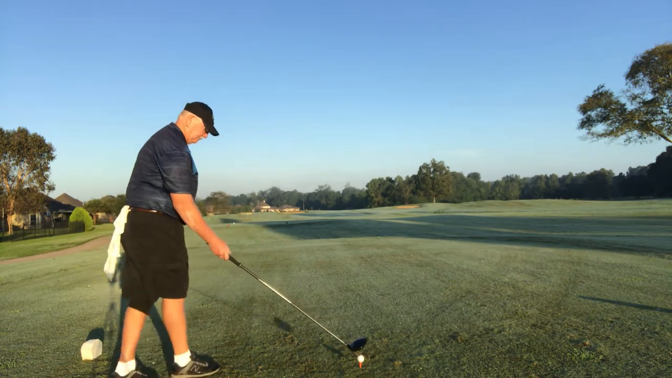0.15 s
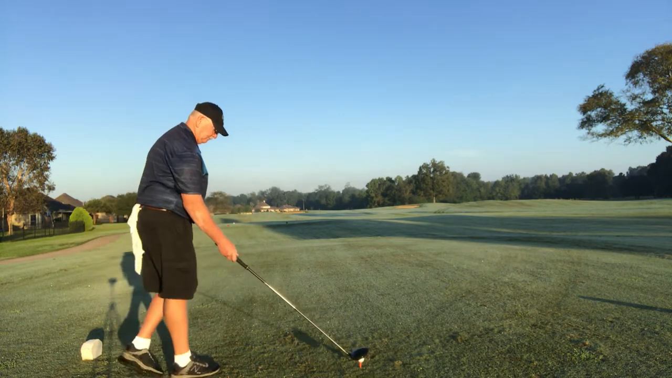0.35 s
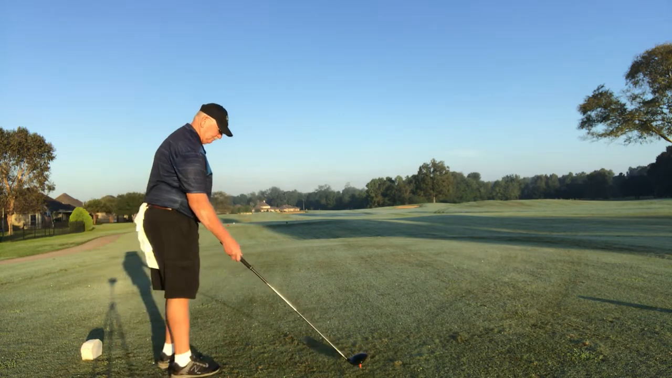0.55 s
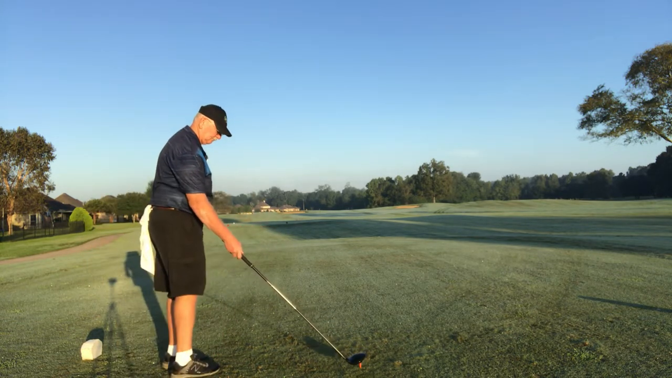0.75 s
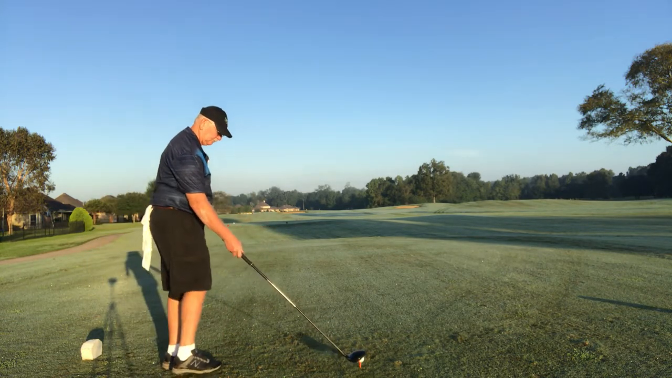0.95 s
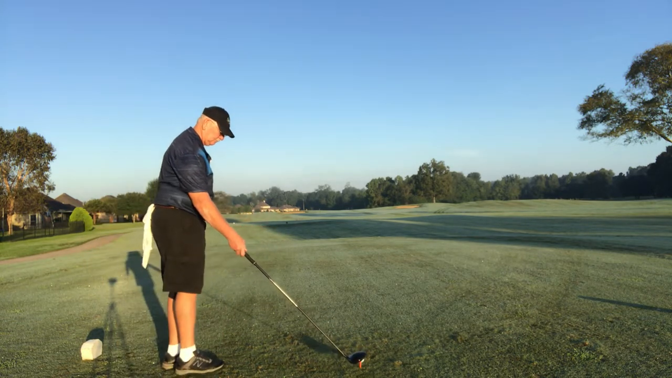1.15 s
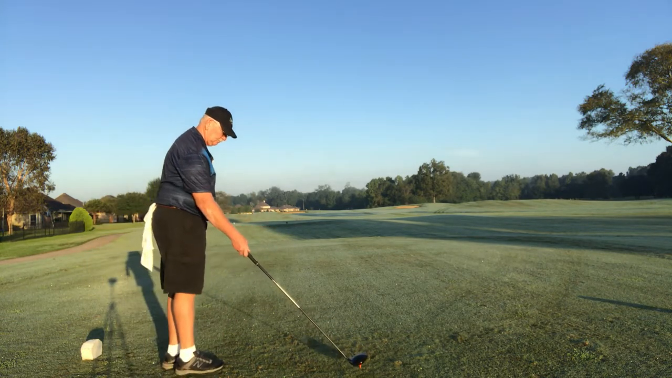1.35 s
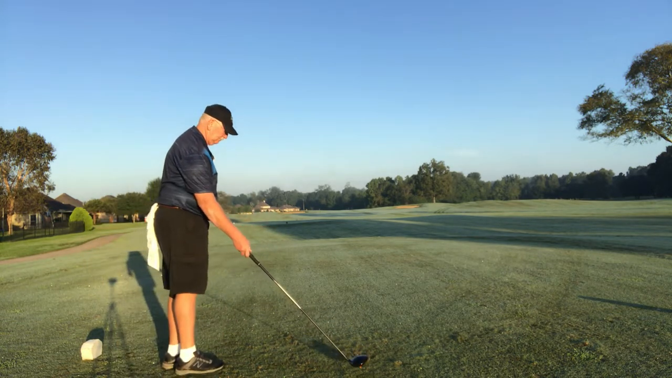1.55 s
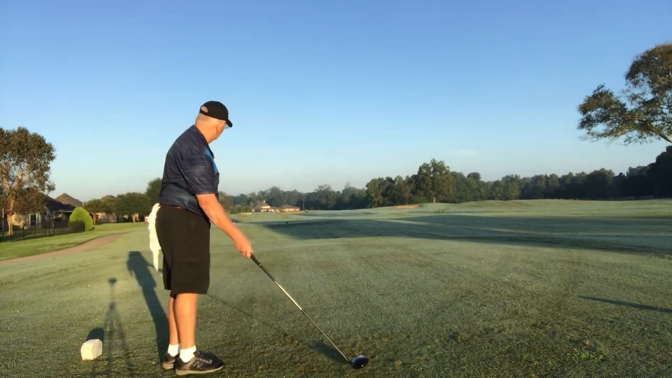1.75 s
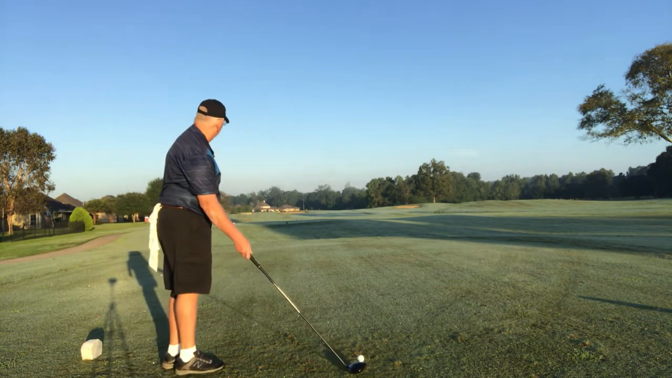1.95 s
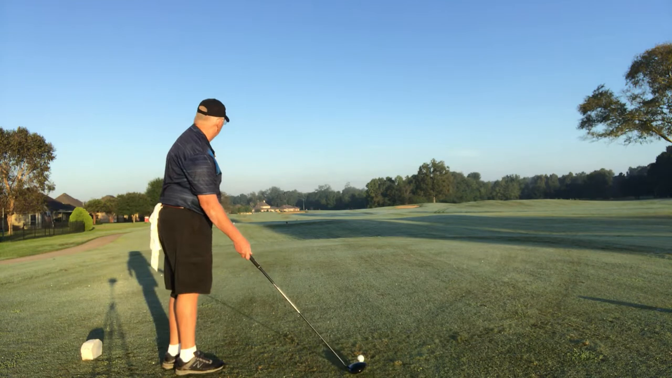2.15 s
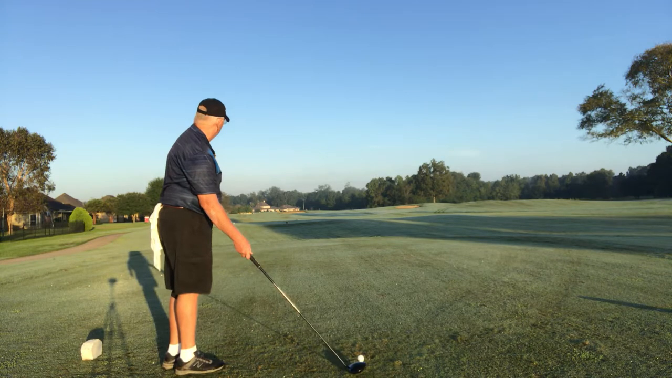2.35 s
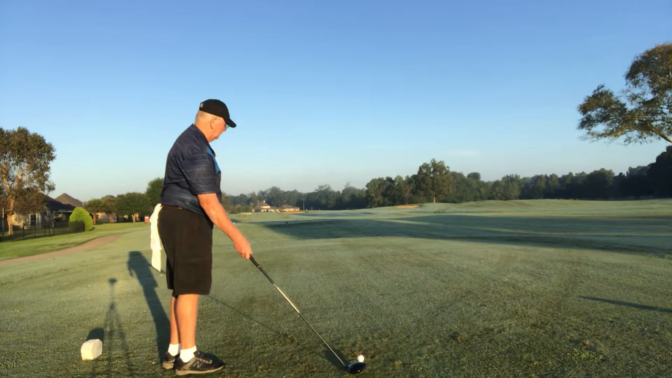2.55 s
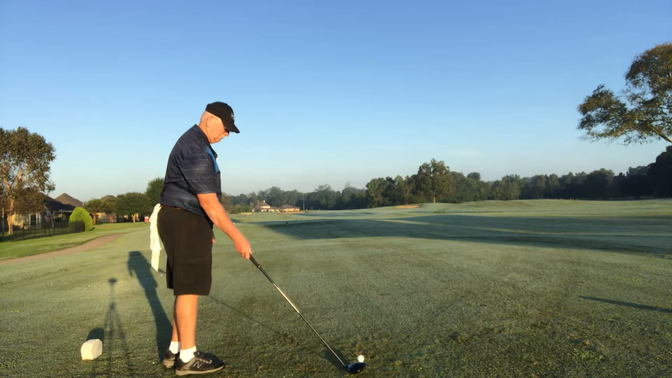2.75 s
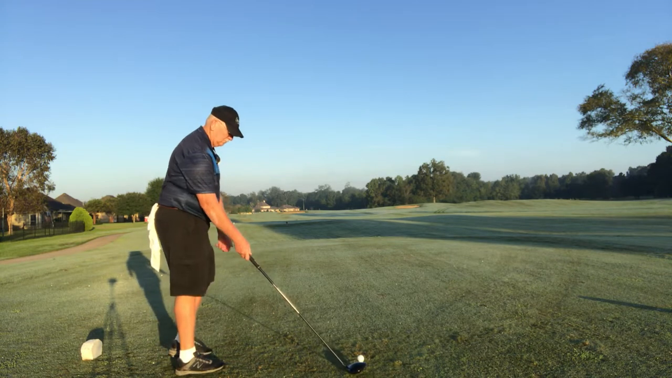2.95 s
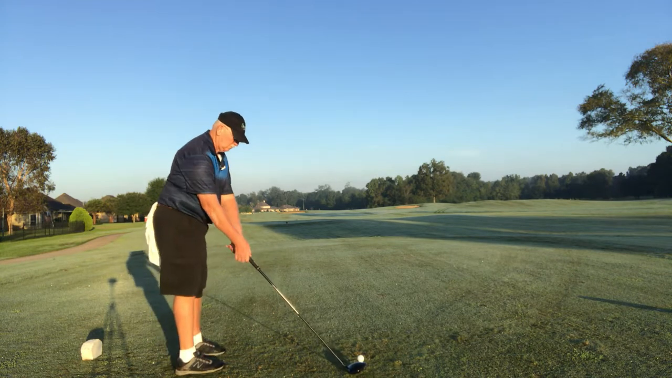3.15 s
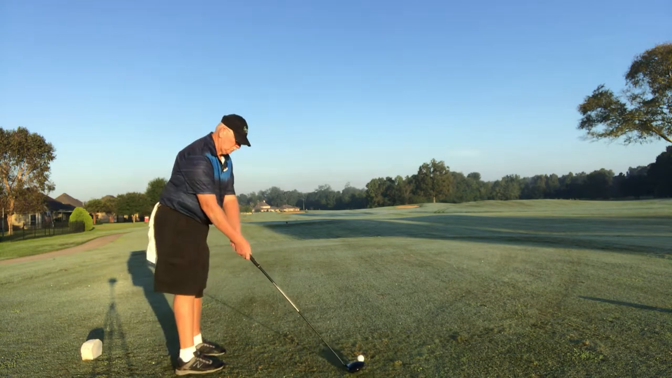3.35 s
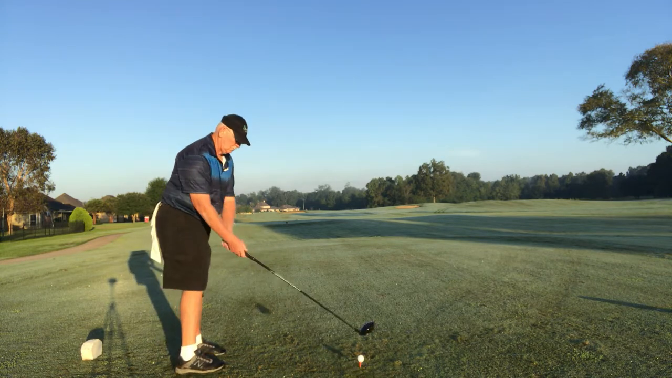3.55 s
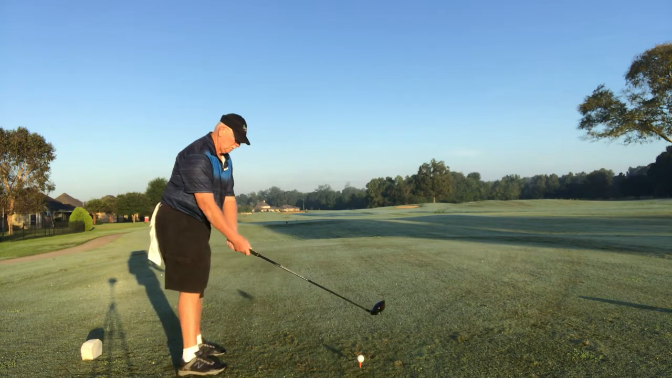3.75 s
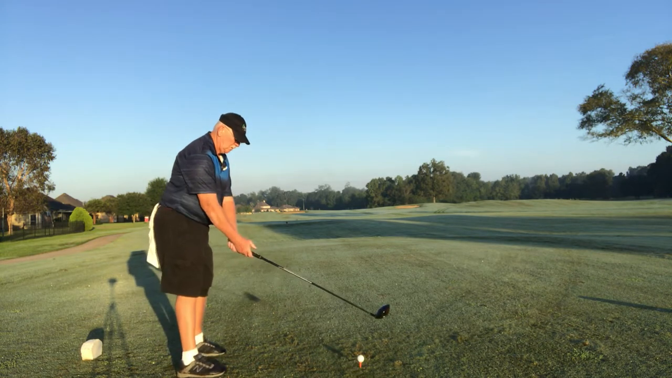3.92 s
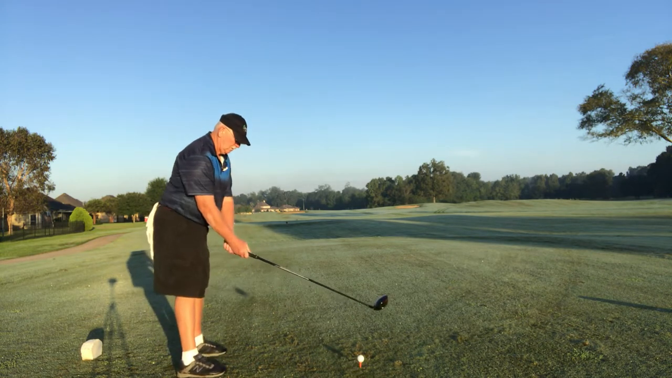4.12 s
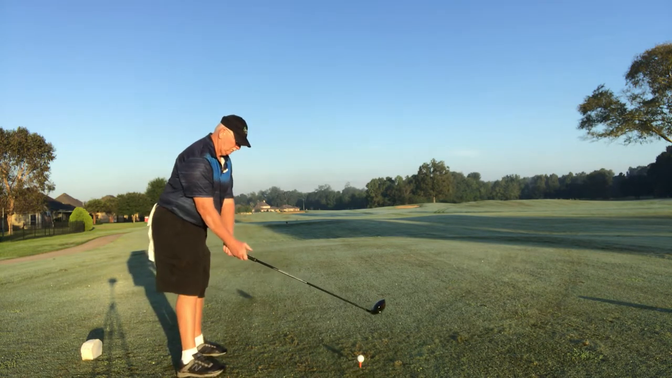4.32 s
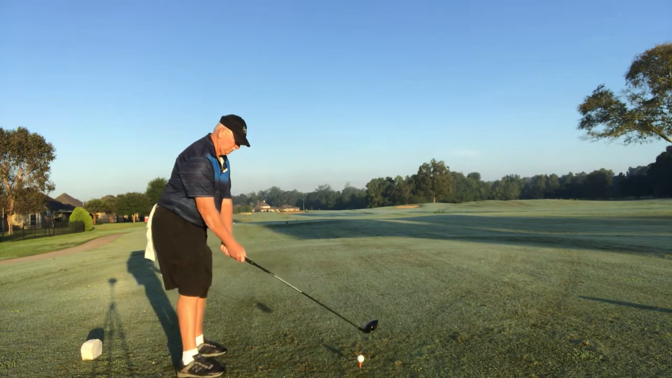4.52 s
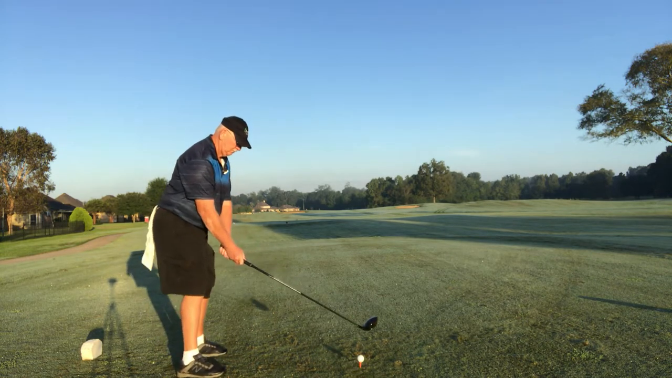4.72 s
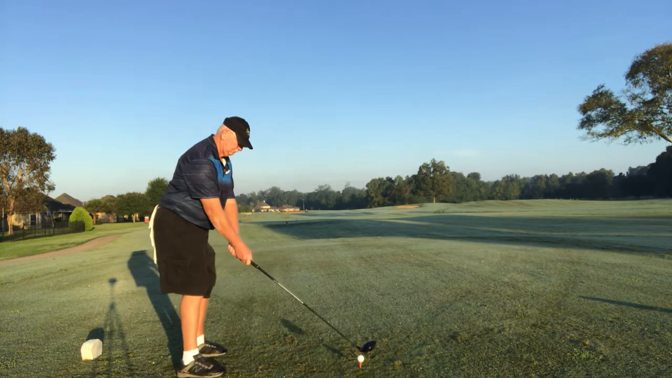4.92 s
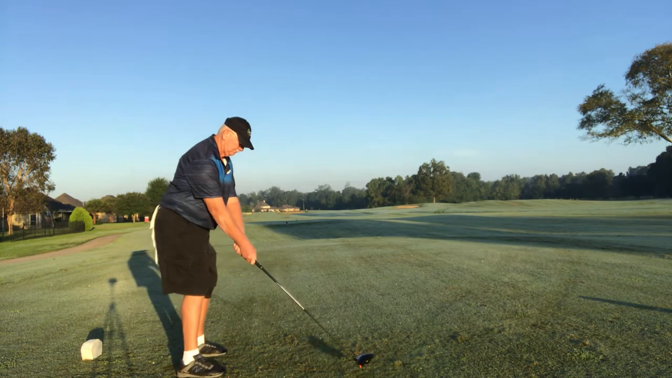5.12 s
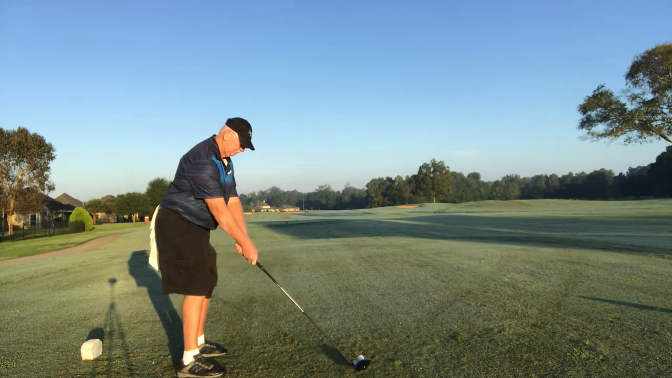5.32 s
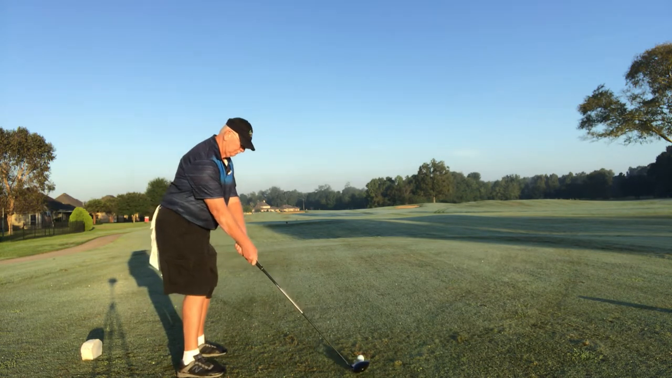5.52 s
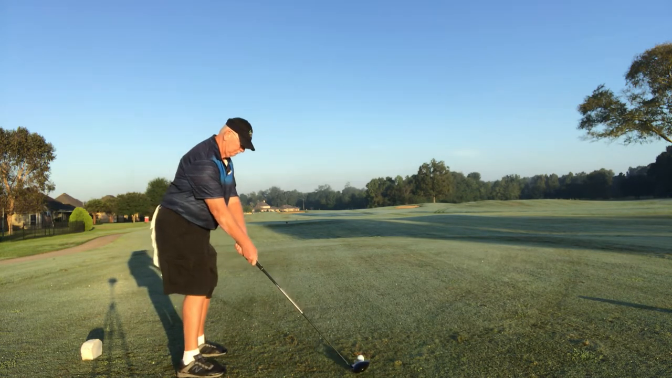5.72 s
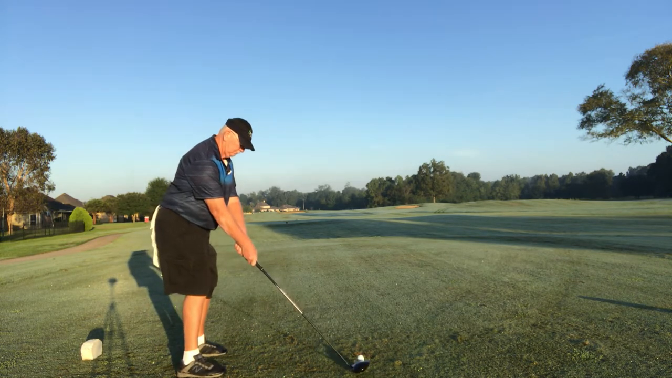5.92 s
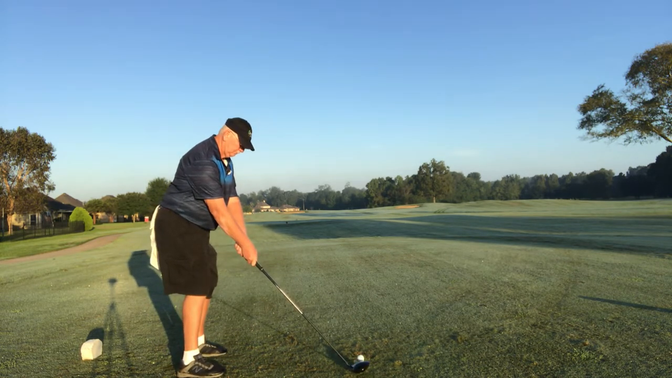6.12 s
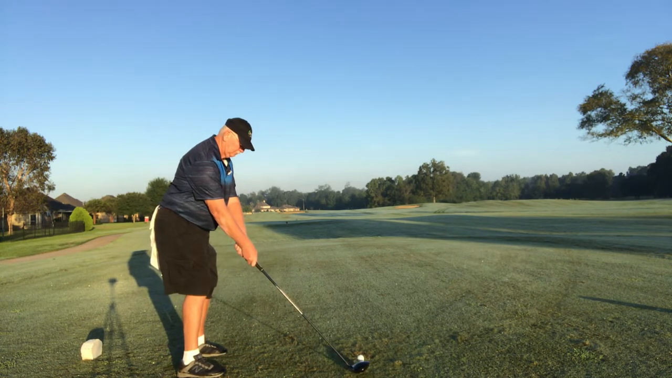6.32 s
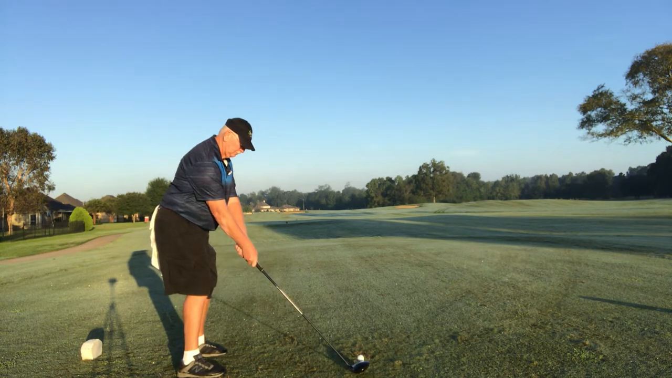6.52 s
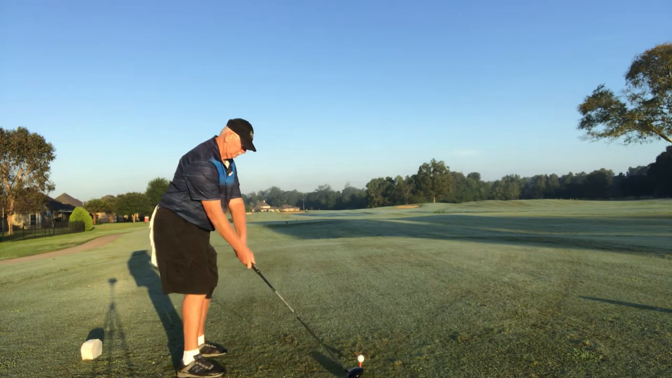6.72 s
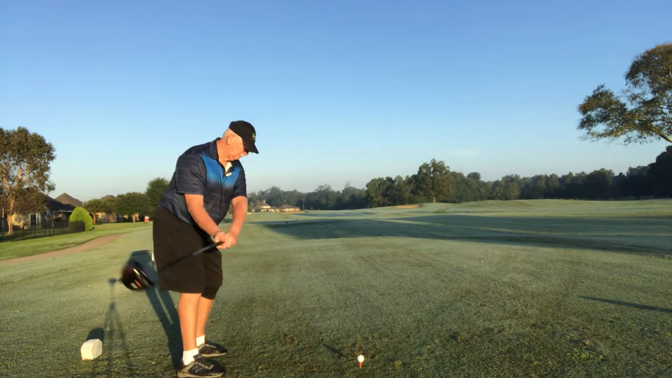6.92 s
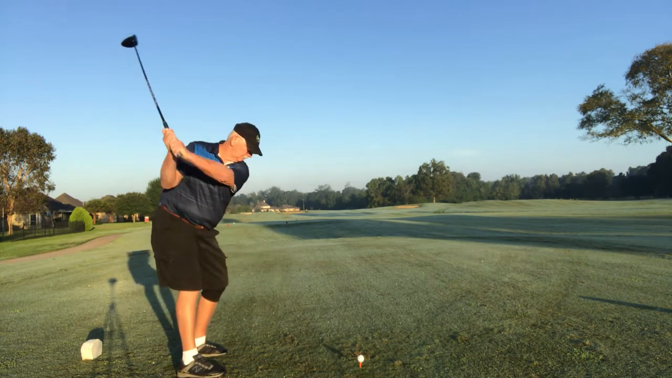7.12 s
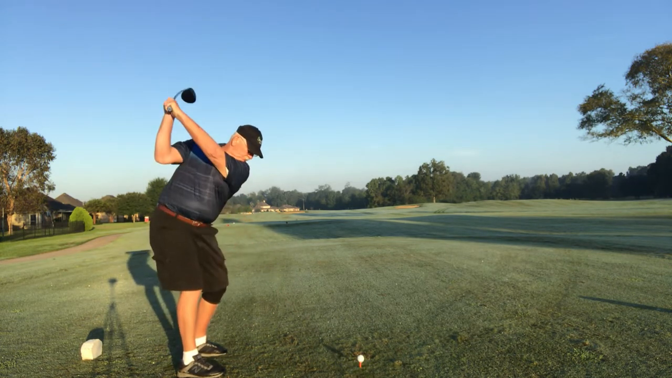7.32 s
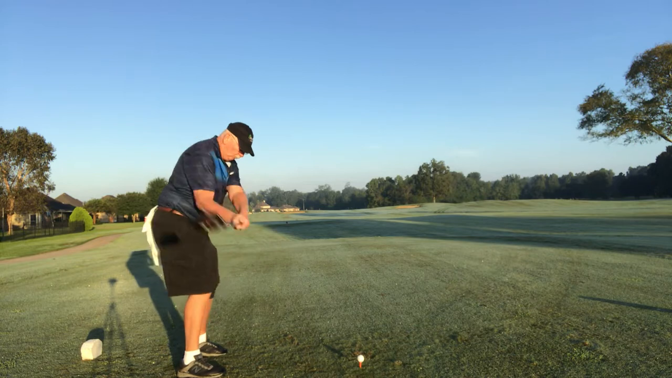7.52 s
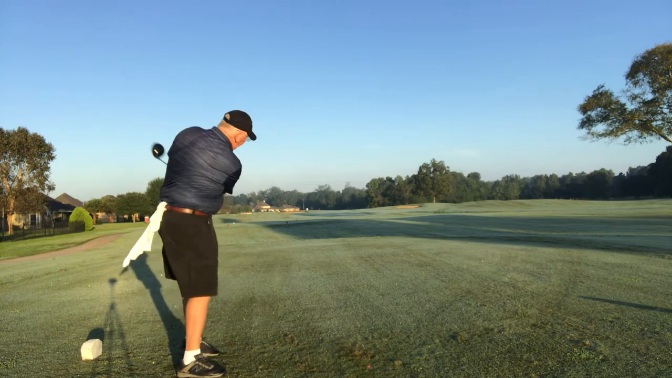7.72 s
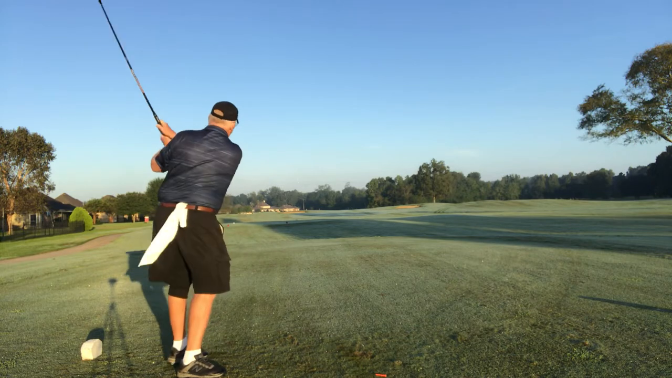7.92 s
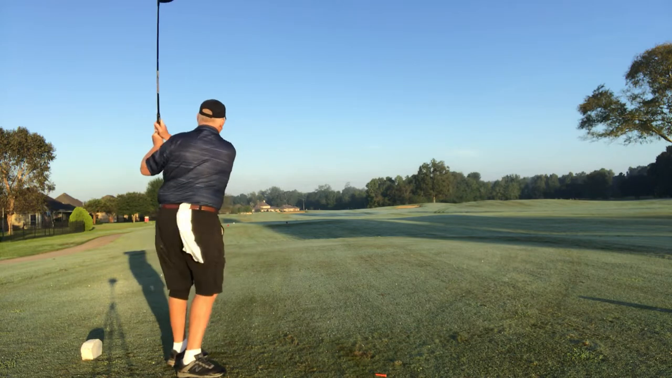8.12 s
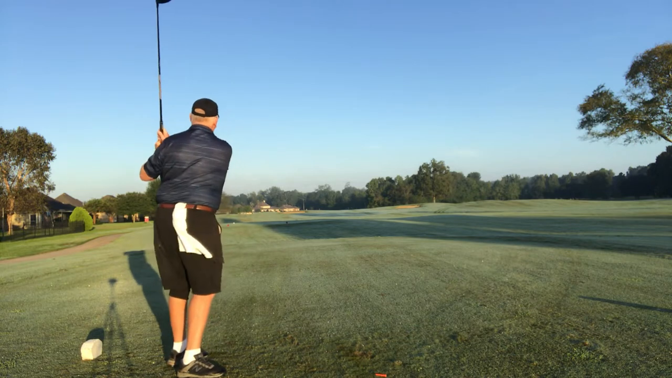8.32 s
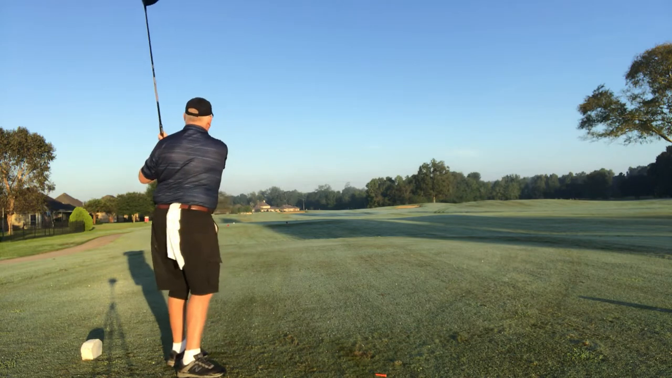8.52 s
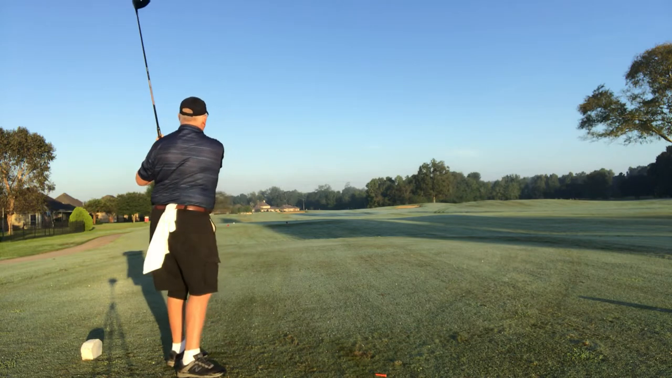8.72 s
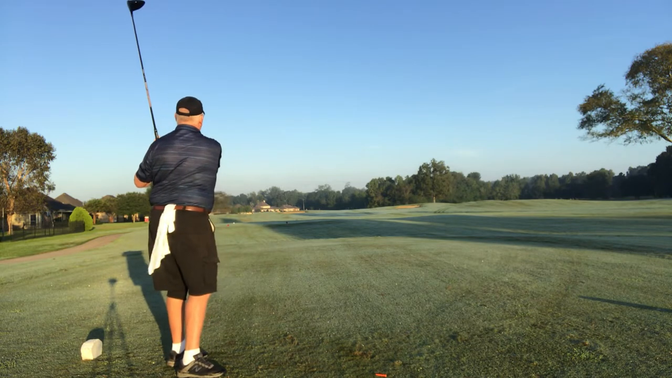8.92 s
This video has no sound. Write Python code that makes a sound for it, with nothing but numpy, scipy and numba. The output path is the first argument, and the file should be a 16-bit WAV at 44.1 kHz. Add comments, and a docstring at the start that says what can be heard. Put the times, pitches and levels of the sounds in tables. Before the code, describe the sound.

For most of the time only a faint outdoor bed: wavering engine hum far off, rumbling traffic, airy hiss, high cricket. Small birds chip and a jay calls harshly early and again just before the swing. Then a quick whoosh and a single explosive, dry, bright crack with a brief metal ring, far louder than everything else. Light rustle, ticks and faint pings trail away, picked up by one phone microphone in the open.

```python
"""First come far mowers, distant traffic, hiss and a trilling cricket; a small bird chips, a jay calls twice.
Late on, a golf driver swishes (shaped noise) and cracks a teed ball (ringing modes plus a noise burst).
A grainy rustle of noise, perhaps clothes and shoes, a sliding rough tone, small ticks and pings come after.
Hums and bird calls are sines on moving pitches; the cricket is a pulsed sine, the air is coloured noise."""
import sys
import numpy as np
from scipy import signal
from scipy.fft import rfft, irfft
from scipy.io import wavfile
from scipy.ndimage import uniform_filter1d
from numba import njit

SR = 44100
rng = np.random.default_rng(int(sys.argv[2]) if len(sys.argv) > 2 else 0)


def transcribe(u):
    """Save the signal u as a 16-bit wav file named by the first command-line argument.

    u: samples, shape (n,) or (channels, n), limited to [-1, 1]; the rate is SR.
    q: integer samples, one column per channel.
    """
    v = np.clip(np.atleast_2d(u).T, -1, 1)
    q = np.round(v * 32767).astype(np.int16)
    wavfile.write(sys.argv[1], SR, q)


N = 399546


def undb(db):
    """Decibels to gain."""
    return 10 ** (np.asarray(db) / 20)


def unit(x):
    """Scale to rms 1."""
    return x / np.sqrt(np.mean(x ** 2))


def since(s):
    """Seconds from a moment on, 0 before it."""
    return np.maximum(np.arange(N) / SR - s, 0)


def gate(start, end, attack, release):
    """Gain that rises from start, holds, and is gone at end."""
    t = np.arange(N) / SR
    return np.clip(np.minimum((t - start) / attack, (end - t) / release), 0, 1)


def decay(t60, seconds):
    """Time axis and exponential fade that loses 60 dB in t60 seconds."""
    t = np.arange(int(seconds * SR)) / SR
    return t, np.exp(-np.log(1000) * t / t60)


def curve(table):
    """Columns of a table joined by straight lines over the whole scene."""
    s, *columns = np.transpose(table)
    return [np.interp(np.arange(N) / SR, s, column) for column in columns]


def walk(rate):
    """Random wandering: levels held 1 / rate s, then smoothed twice; spread near 1."""
    k = int(SR / rate)
    steps = np.repeat(rng.standard_normal(N // k + 1), k)
    return 1.312 * uniform_filter1d(uniform_filter1d(steps, k), k)[:N]


def tone(hz):
    """Sine of rms 1 that follows a pitch curve."""
    return np.sqrt(2) * np.sin(2 * np.pi * np.cumsum(hz) / SR)


def coloured(spectrum):
    """Noise of rms 1 with the given spectrum."""
    hz, db = np.transpose(spectrum)
    bins = np.arange(1, N // 2 + 2) * SR / N
    gain = undb(np.interp(np.log(bins), np.log(hz), db))
    return unit(irfft(rfft(rng.standard_normal(N)) * gain, N))


def band(x, hz, width_hz):
    """Two-pole resonance, gain 1 at the centre."""
    return signal.lfilter(*signal.iirpeak(hz, hz / width_hz, fs=SR), x)


def add(out, s, x):
    """Mix x into out at time s."""
    i = int(s * SR)
    out[i:i + len(x)] += x[:N - i]


# The blow and its mirror in the ground: t/s, level/dB (gain on ring and burst)
BLOWS = [(7.6930, 9), (7.6992, 1.5)]
# Ringing modes of the hollow metal head: f/Hz, level/dB (before the blow's gain), time to fade 60 dB/s
HEAD_MODES = [(320, -26.5, 0.022), (600, -16, 0.023), (858, -17, 0.017), (1050, -12.5, 0.017),
              (1193, -14, 0.02008), (1340, -9.5, 0.017), (2000, -58, 0.44), (2980, -53, .25),
              (3850, -19, .055), (3980, -9.5, 0.078), (4126, -19, .065), (4245, -16, 0.045),
              (4430, -27, 0.08), (5114, -31, .05), (5540, -8, .032), (5690, -13, .035), (5756, -12, .035),
              (6090, -18.5, .055), (6487, -22, 0.054), (6700, -19.5, 0.058), (8000, -22, 0.051),
              (9250, -27.5, .03), (11440, -16, 0.037), (12000, -26.5, 0.036)]
# Tone colour of the crack: f/Hz, level/dB (per Hz, relative)
CRACK_COLOUR = [(160, -40), (250, -4), (420, -7.5), (650, -7), (1400, -2), (2000, -7), (2500, -6.5),
                (3200, -10), (4000, -4), (5700, -4), (7500, -6), (10000, -9.5), (12000, -9), (16000, -18.5)]
# Short and long part of the noise burst: level/dB (before the blow's gain), time to fade 60 dB/s
CRACK_PARTS = [(-12.5, 0.031), (-28.5, .08)]
CONTACT_S = 0.0009  # the ball squashes on the face before it leaves
HEAD_WOBBLE, HEAD_FLICKER_DB = .003, 3  # the head twists as it flies on: share of pitch, dB


def strike():
    """Head modes start together, neighbours in opposite sense; noise is the crushed ball and dense upper modes."""
    out, noise = np.zeros(N), coloured(CRACK_COLOUR)
    ring = 0
    for k, (hz, db, t60) in enumerate(HEAD_MODES):
        t, fade = decay(t60, .25)
        flicker_db = HEAD_FLICKER_DB * np.minimum(t / .015, 1) * walk(140)[:len(t)]  # sets in over 15 ms
        wobbling_hz = hz * (1 + HEAD_WOBBLE * walk(100)[:len(t)])
        sine = tone(wobbling_hz) / np.sqrt(2)  # peak 1
        ring = ring + (-1) ** k * undb(db + flicker_db) * fade * sine
    push = np.sin(np.pi / 2 * np.minimum(t / CONTACT_S, 1)) ** 2
    burst = sum(undb(part_db) * decay(t60, .25)[1] for part_db, t60 in CRACK_PARTS)
    for s, db in BLOWS:
        i = int(s * SR)
        add(out, s, undb(db) * push * (ring + burst * noise[i:i + len(burst)]))
    return out


# Tone colour of the swish: f/Hz, level/dB (per Hz, relative)
SWISH_COLOUR = [(120, -33.5), (250, -10.5), (600, -5), (1000, -7), (1600, -16), (5900, -21.5),
                (12600, -32.5), (16000, -34.5)]
# Sets in suddenly and falls off as a parabola in dB; the treble peaks later, at the ball
SWING_FROM_S, SWING_PEAK_S, SWING_BRIGHT_PEAK_S = 7.58, 7.672, 7.69
SWING_DB, SWING_DB_PER_S2, SWING_SPLIT_HZ = -38.5, 2100, 2000


def swing():
    """Turbulence behind the shaft: fluttering noise that brightens as it speeds up."""
    t, noise = np.arange(N) / SR, coloured(SWISH_COLOUR)
    low = signal.lfilter(*signal.butter(1, SWING_SPLIT_HZ, fs=SR), noise)
    parts = ((low, SWING_PEAK_S), (noise - low, SWING_BRIGHT_PEAK_S))
    swish = sum(x * undb(SWING_DB - SWING_DB_PER_S2 * (t - peak) ** 2) for x, peak in parts)
    flutter = undb(1.6 * walk(150))
    return gate(SWING_FROM_S, BLOWS[0][0], .02, .008) * flutter * swish


# Tone colour of the broad rustle: f/Hz, level/dB (per Hz, relative)
RUSTLE_COLOUR = [(290, -45.5), (500, -15), (919, -9), (3540, -14), (4340, -13.5), (5090, -18),
                 (6330, -10.5), (7210, -18), (16000, -27.5)]
# Ringing bands in the rustle: f/Hz, width of each of two filter passes/Hz, level/dB (relative)
RUSTLE_BANDS = [(4230, 500, -0.5), (6110, 500, 3), (2480, 740, -3)]
# Dry ticks: t/s, level/dB (peak), f/Hz (centre), width of each of three filter passes/Hz
TICKS = [(7.8493, -40, 1910, 1300), (7.8796, -46, 1500, 1300), (7.9254, -33.5, 1170, 1200),
         (8.0323, -39, 2470, 700), (8.0564, -32.5, 2180, 1900), (8.2053, -37, 2200, 2500),
         (8.3241, -54, 2200, 900), (8.3551, -44, 2600, 2600), (8.7390, -53, 3000, 6000)]
# Pings cut from the ringing bands: t/s, level/dB (gain before the fade)
PINGS = [(8.036, -53), (8.204, -69), (8.324, -57), (8.355, -67), (8.499, -60), (8.569, -69), (8.631, -64),
         (8.652, -69)]
# Noise right behind the blow: level at the blow and fade
EARLY_DB, EARLY_DB_PER_S = -54, 90
EARLY_RING_DB, EARLY_RING_DB_PER_S = -51, 230.5
# A later, longer rustle that starts and stops quickly
LATE_FROM_S, LATE_TO_S, LATE_ATTACK_S, LATE_RELEASE_S = 7.885, 8.10, 0.014, 0.019
LATE_DB, LATE_DB_PER_S = -53.5, 44
LATE_RING_DB, LATE_RING_ATTACK_S, LATE_RING_RELEASE_S = -60.5, .05, 0.061
TICK_T60_S, PING_T60_S = .009, 0.053


def aftermath():
    """A grainy rustle, perhaps clothes and shoes in the follow-through, then lone ticks and pings."""
    after, late_end = since(BLOWS[0][0]), LATE_TO_S + LATE_RELEASE_S

    early = (after > 0) * undb(EARLY_DB - EARLY_DB_PER_S * after)
    late_fade = undb(LATE_DB - LATE_DB_PER_S * since(LATE_FROM_S))
    late = gate(LATE_FROM_S, late_end, LATE_ATTACK_S, LATE_RELEASE_S) * late_fade
    broad_gain = np.hypot(early, late)

    early_ring = (after > 0) * undb(EARLY_RING_DB - EARLY_RING_DB_PER_S * after)
    late_ring = undb(LATE_RING_DB) * gate(LATE_FROM_S, late_end, LATE_RING_ATTACK_S, LATE_RING_RELEASE_S)
    ring_gain = np.hypot(early_ring, late_ring)

    white = rng.standard_normal(N)
    ringing = unit(sum(undb(db) * band(band(white, hz, w), hz, w) for hz, w, db in RUSTLE_BANDS))
    out = broad_gain * undb(3.5 * walk(150)) * coloured(RUSTLE_COLOUR)
    out = out + ring_gain * undb(4.5 * walk(70)) * ringing

    t, fade = decay(TICK_T60_S, .08)
    for s, db, hz, width_hz in TICKS:
        tick = fade * np.minimum(t / .001, 1) * rng.standard_normal(len(t))
        for _ in range(3):
            tick = band(tick, hz, width_hz)
        add(out, s, undb(db) * tick / np.abs(tick).max())

    t, fade = decay(PING_T60_S, .06)
    for s, db in PINGS:
        ping = ringing[int(s * SR):][:len(t)]
        add(out, s, undb(db) * np.minimum(t / .0015, 1) * fade * ping)
    return out


# A rough band that slides upward inside the rustle
STREAK_FROM_S, STREAK_TO_S, STREAK_ATTACK_S, STREAK_RELEASE_S = 7.88, 8.05, .03, .06
STREAK_HZ, STREAK_HZ_PER_S, STREAK_DB = 4170, 2900, -64


def streak():
    """A tone whose fast wobble and flutter make it sound like a narrow band of noise."""
    hz = STREAK_HZ + STREAK_HZ_PER_S * np.minimum(since(STREAK_FROM_S), STREAK_TO_S - STREAK_FROM_S)
    shape = gate(STREAK_FROM_S, STREAK_TO_S, STREAK_ATTACK_S, STREAK_RELEASE_S)
    return shape * undb(STREAK_DB + 3.7 * walk(120)) * tone(hz * (1 + 0.028 * walk(500)))


# Jay calls: t/s, length/s, f/Hz (starting pitch), level/dB (reference for the harmonics)
JAY_CALLS = [(2.379, 0.29, 802, -64.5), (6.743, .27, 794, -64.5)]
# Harmonics of the call: multiple of the pitch, level/dB (added to the call's level)
JAY_HARMONICS = [(4, 1), (6, -14), (7, -14), (8, -11.5), (10, -19)]
JAY_SAG_HZ_PER_S, JAY_SAG_HZ_PER_S2, JAY_DB_PER_S = 150, 950, 28
JAY_ATTACK_S, JAY_RELEASE_S, JAY_WOODS_DB = 0.024, .015, -9
# Upper harmonics
JAY_TOP_LATE_S, JAY_TOP_S, JAY_TOP_ATTACK_S, JAY_TOP_RELEASE_S = .015, 0.23, .03, .07


def jay():
    """Falling nasal calls: a strong fourth harmonic; upper ones come late, break up and leave early."""
    out = 0
    for s, length, start_hz, db in JAY_CALLS:
        t = np.minimum(since(s), length)
        hz = start_hz - JAY_SAG_HZ_PER_S * t - JAY_SAG_HZ_PER_S2 * t ** 2
        hz = hz * (1 + 0.00293 * walk(90))
        top_from = s + JAY_TOP_LATE_S
        top = gate(top_from, top_from + JAY_TOP_S, JAY_TOP_ATTACK_S, JAY_TOP_RELEASE_S)
        stack = 0
        for k, harmonic_db in JAY_HARMONICS:
            upper = k > 4
            flutter_db = (4.2 if upper else 1.6) * walk(60)
            shape = top if upper else 1
            stack = stack + undb(harmonic_db + flutter_db) * shape * tone(round(k) * hz)
        call = gate(s, s + length, JAY_ATTACK_S, JAY_RELEASE_S)
        out = out + call * undb(db - JAY_DB_PER_S * t) * stack
    return out + undb(JAY_WOODS_DB) * woods(out)[:N]


# Small bird: t/s, level/dB (peak of the direct sound), f/Hz (start of the upward glide)
CHIPS = [(1.0186, -66, 5200), (2.162, -61.5, 5000), (2.3194, -72, 5600), (3.36, -66, 5200),
         (6.6399, -64.5, 6330), (7.1071, -65, 5170), (7.2594, -69, 5200), (8.8264, -64.5, 5770)]
CHIP_TO_HZ, CHIP_RISE_S, CHIP_S, CHIP_WOODS_DB = 7450, .007, 0.02, -2.5


def chips():
    """Quick upward whistles that flatten at the top, smeared by the woods."""
    t = np.arange(int(CHIP_S * SR)) / SR
    out = np.zeros(N)
    for s, db, from_hz in CHIPS:
        hz = CHIP_TO_HZ - (CHIP_TO_HZ - from_hz) * np.exp(-t / CHIP_RISE_S)
        chip = np.sin(np.pi * t / CHIP_S) ** 0.39 * np.sin(2 * np.pi * np.cumsum(hz) / SR)
        add(out, s - .003, undb(db) * chip)
        add(out, s + 0.012, undb(db + CHIP_WOODS_DB) * woods(chip))
    return out


def woods(x, t60=.3):
    """Dense echo from the tree line: fading noise, with about the same energy as the sound."""
    tail = decay(t60, .3)[1] * rng.standard_normal(int(.3 * SR))
    return signal.fftconvolve(x, tail / np.sqrt(np.sum(tail ** 2)))


CRICKET_HZ, CRICKET_PULSE_HZ, CRICKET_DEPTH = 4580, 59.1, .25  # depth is the rms of the pulsing
CRICKET_DB, CRICKET_SWELL_DB, CRICKET_CHOP_DB = -79.5, 2.5, 3
CRICKET_ON, CRICKET_RUNS_PER_S = 2.6, 28  # mean gain before clipping at 1; rate of its wandering


def cricket():
    """A narrow tone pulsed at the wing-stroke rate, stuttering as its level dips briefly."""
    pulse = 1 + CRICKET_DEPTH * tone(CRICKET_PULSE_HZ * (1 + 0.031 * walk(4.6)))
    runs = np.clip(CRICKET_ON + 2 * walk(CRICKET_RUNS_PER_S), 0, 1)
    db = CRICKET_DB + CRICKET_SWELL_DB * walk(6) + CRICKET_CHOP_DB * walk(50)
    return runs * undb(db) * unit(pulse) * tone(CRICKET_HZ * (1 + 0.001 * walk(30)))


# Mower that labours, louder while its pitch sags: t/s, f/Hz, level/dB (rms, before the waver)
LABOURING_HUM = [(0.0, 153, -62), (2.5, 152.3, -62), (2.9, 155.4, -72), (3.7, 155.1, -63),
                 (4.19, 146, -54.5), (4.79, 147.1, -51.5), (5.07, 151.8, -57), (6.53, 153.7, -61.5),
                 (9.06, 158.8, -58.5)]
# Mower tones of fixed mean pitch: f/Hz, level/dB (rms, before waver and dip), dip starts t/s, dip ends t/s
STEADY_HUMS = [(81.2, -58, 7.65, 8.4), (229, -73, 6.13, 9.5)]
HUM_FADE_S, HUM_DIP_DB = .3, -10  # the hum fades for a moment


def mowers():
    """Far engine tones that waver as the air between shifts."""
    hums = [curve(LABOURING_HUM)]
    for hz, db, dip_from, dip_to in STEADY_HUMS:
        hums.append((hz, db + HUM_DIP_DB * gate(dip_from, dip_to, HUM_FADE_S, HUM_FADE_S)))
    return sum(undb(db + 2.2 * walk(7.3)) * tone(hz * (1 + .008 * walk(12))) for hz, db in hums)


# Tone colour of the traffic rumble: f/Hz, level/dB (per Hz, relative)
RUMBLE_COLOUR = [(15, -51.5), (27, -27.5), (50, -3.5), (70, -1.5), (110, -4.5), (180, -11), (300, -19),
                 (450, -30), (700, -60.5)]
# Tone colour of the morning hiss: f/Hz, level/dB (per Hz, relative)
HISS_COLOUR = [(240, -29), (400, -8), (474, -6.5), (706, -1), (1050, -1.5), (1720, -9.5), (2370, -10.5),
               (4320, -15.5), (4960, -20), (7400, -18), (8500, -24), (10400, -29.5), (11500, -27),
               (15700, -29)]
RUMBLE_DB, HISS_DB = -55, -64


def air():
    """Distant traffic and morning hiss as coloured noise; the rumble swells more than the hiss."""
    rumble = undb(RUMBLE_DB + 1.0 * walk(3.6)) * coloured(RUMBLE_COLOUR)
    hiss = undb(HISS_DB + 0.4 * walk(1.495)) * coloured(HISS_COLOUR)
    return rumble + hiss


def scene():
    """Everything reaches one microphone."""
    golf = strike() + swing() + aftermath() + streak()
    return (golf + jay() + chips() + cricket() + mowers() + air())[None]


@njit
def follow(x, release):
    """Peak follower: jumps up at once, falls slowly."""
    e, out = 0., np.empty(len(x))
    for i in range(len(x)):
        e = max(abs(x[i]), e * release)
        out[i] = e
    return out


LIMIT_DB, LIMIT_RATIO, LIMIT_RELEASE_S = -9, 2, 0.02
TOP_HZ = 15800


def record(dry):
    """A phone's limiter turns loud moments down, tanh rounds peaks and a steep filter cuts the top."""
    peak = follow(dry[0], np.exp(-1 / (LIMIT_RELEASE_S * SR)))
    gain = np.minimum(undb(LIMIT_DB) / (peak + 1e-9), 1) ** (1 - 1 / LIMIT_RATIO)
    top_cut = signal.ellip(10, .2, 60, TOP_HZ, fs=SR, output="sos")
    return signal.sosfilt(top_cut, np.tanh(dry * gain))


dry = scene()
out = record(dry)
transcribe(out)
```